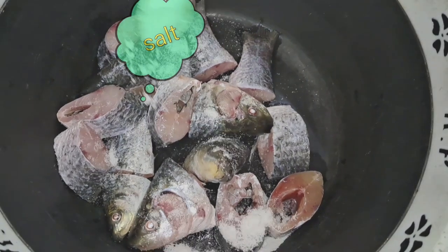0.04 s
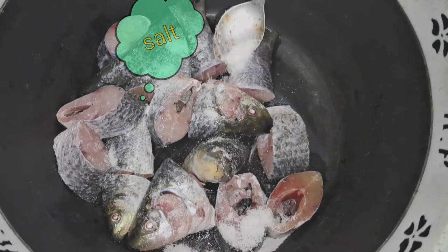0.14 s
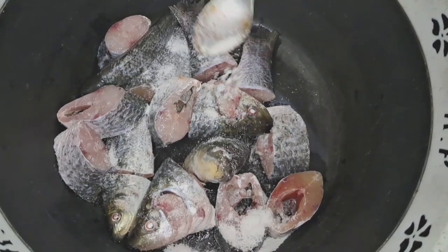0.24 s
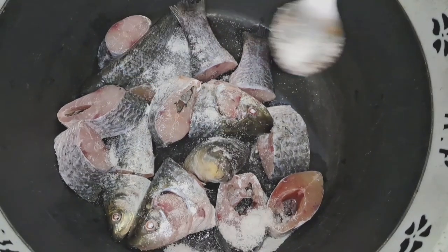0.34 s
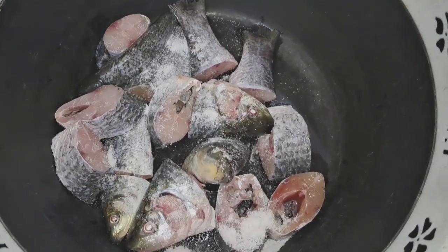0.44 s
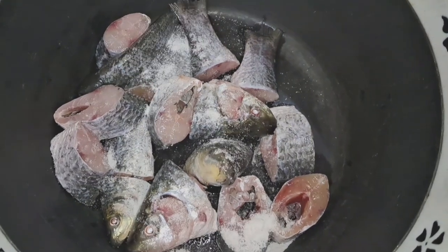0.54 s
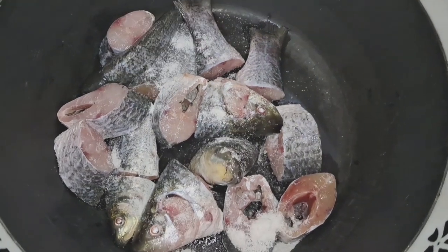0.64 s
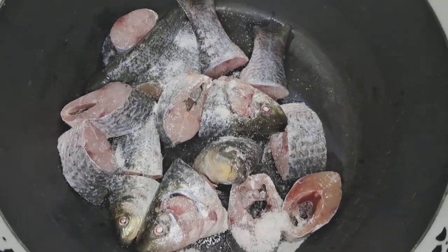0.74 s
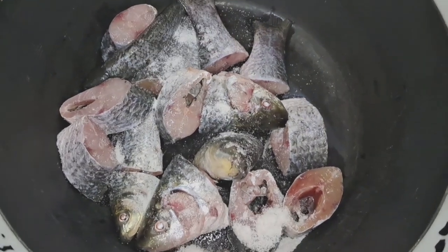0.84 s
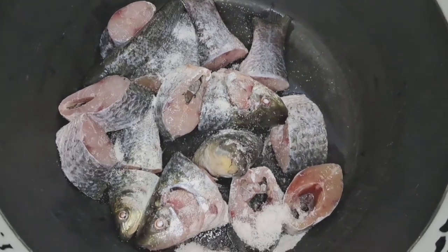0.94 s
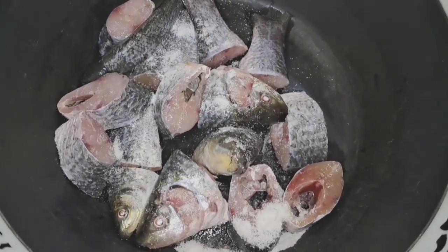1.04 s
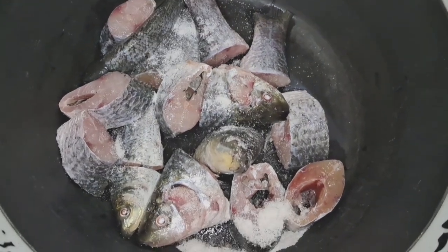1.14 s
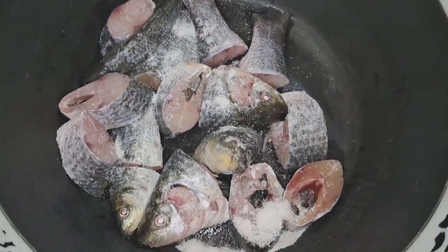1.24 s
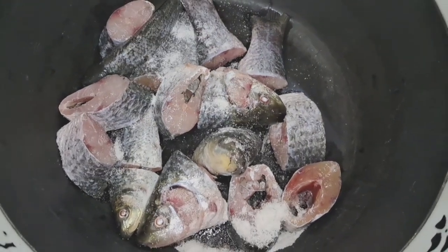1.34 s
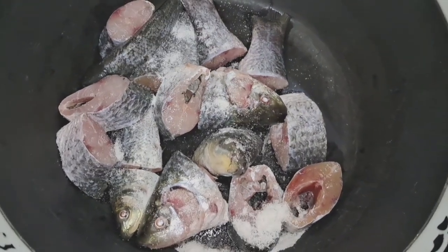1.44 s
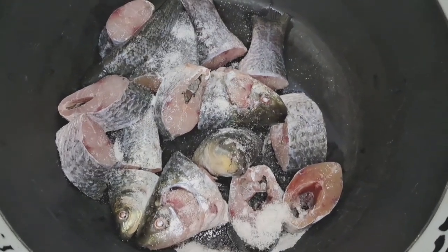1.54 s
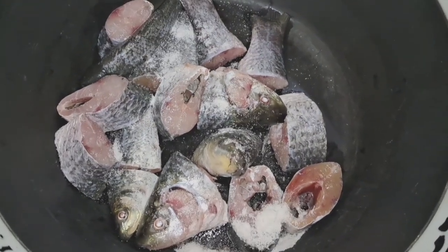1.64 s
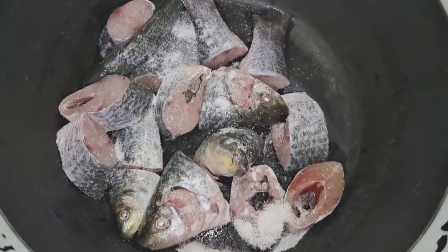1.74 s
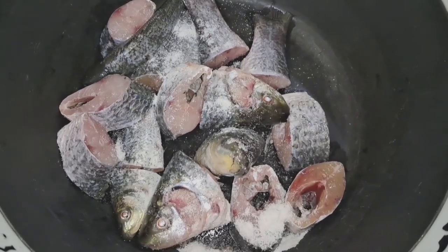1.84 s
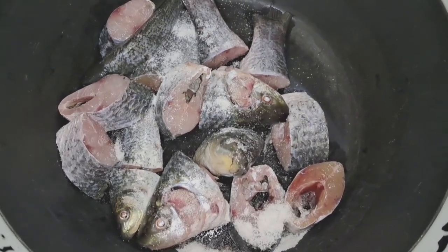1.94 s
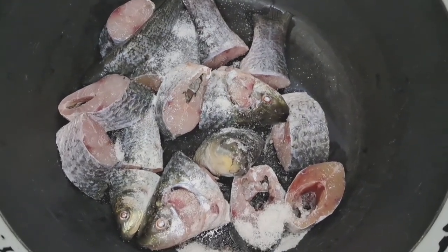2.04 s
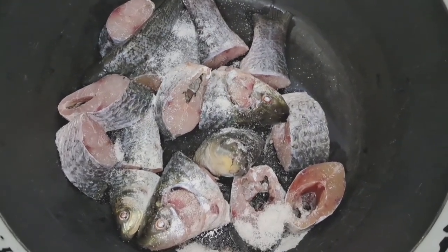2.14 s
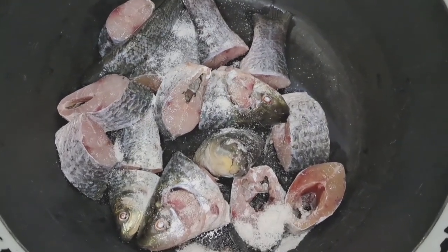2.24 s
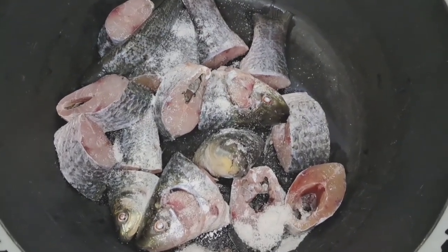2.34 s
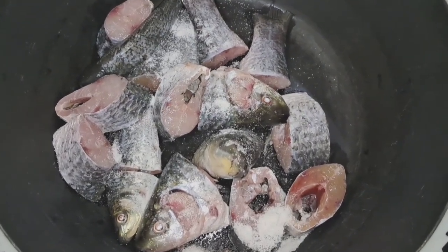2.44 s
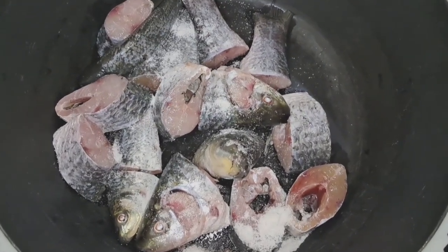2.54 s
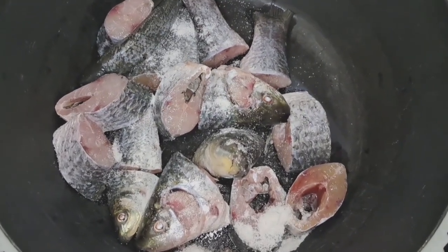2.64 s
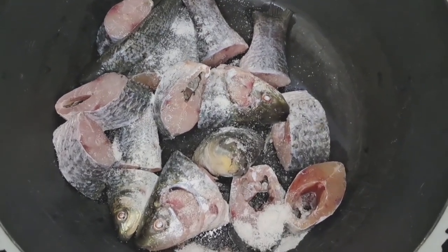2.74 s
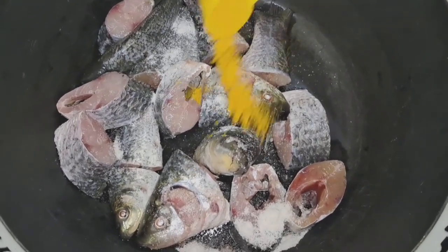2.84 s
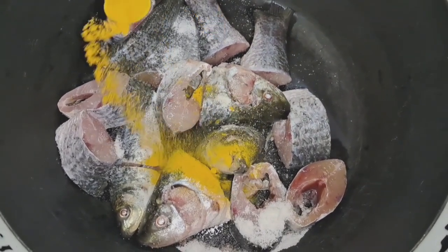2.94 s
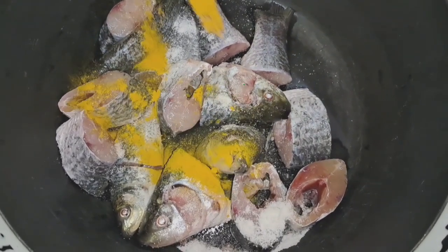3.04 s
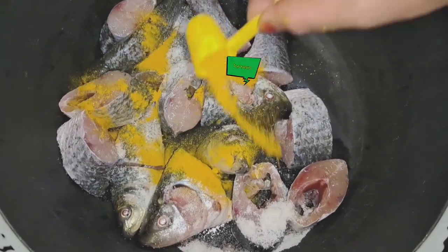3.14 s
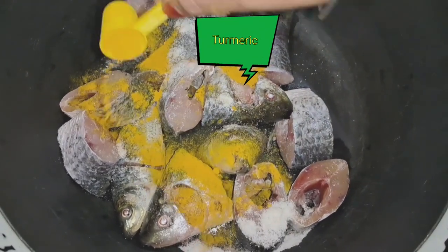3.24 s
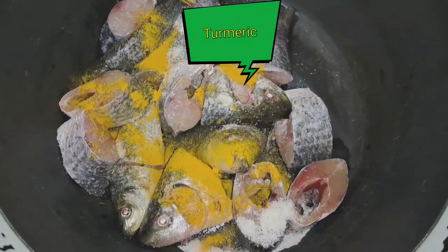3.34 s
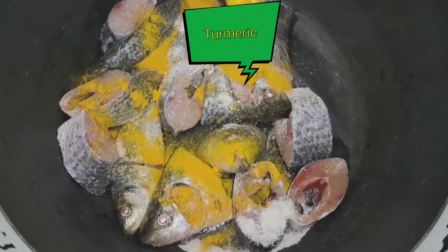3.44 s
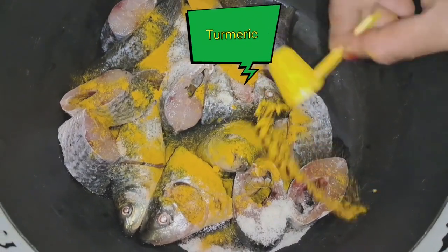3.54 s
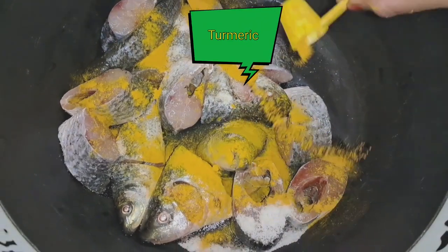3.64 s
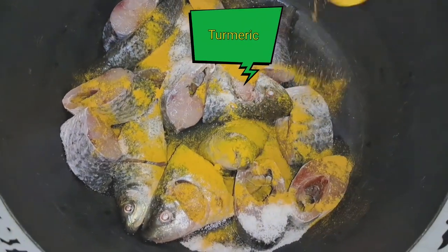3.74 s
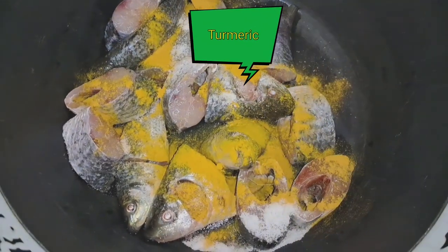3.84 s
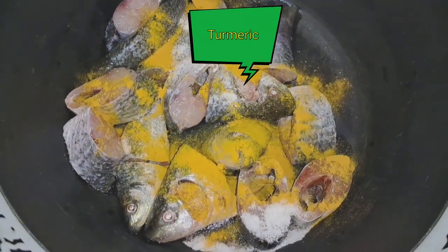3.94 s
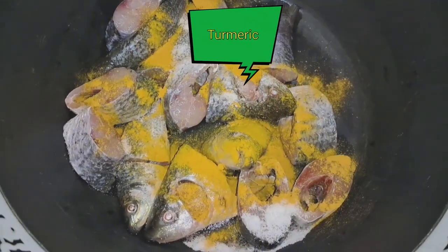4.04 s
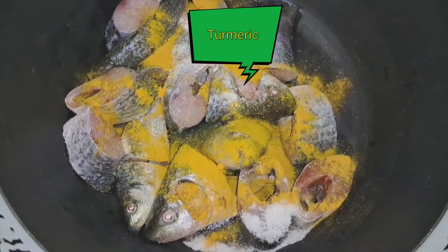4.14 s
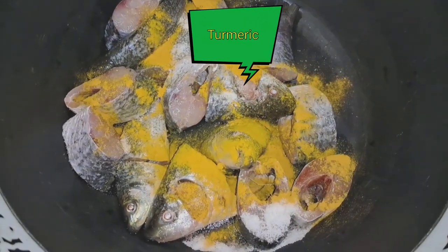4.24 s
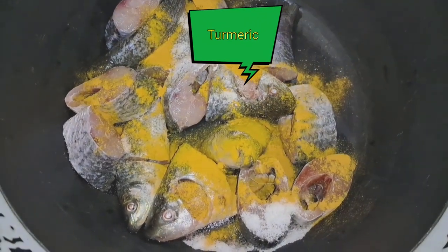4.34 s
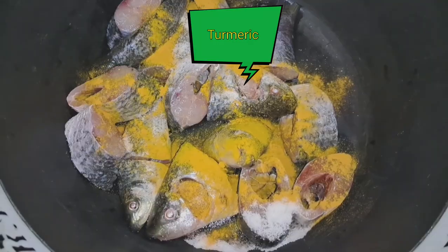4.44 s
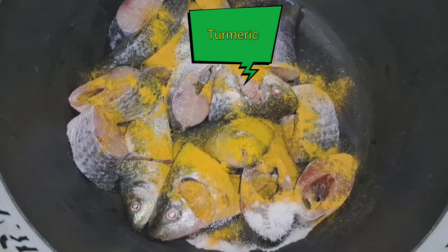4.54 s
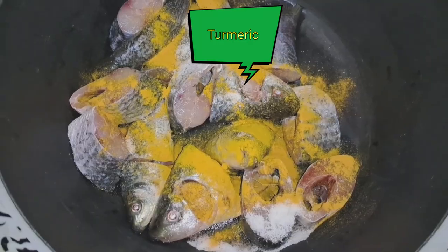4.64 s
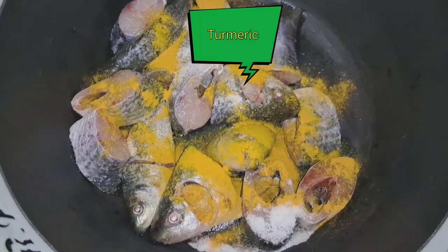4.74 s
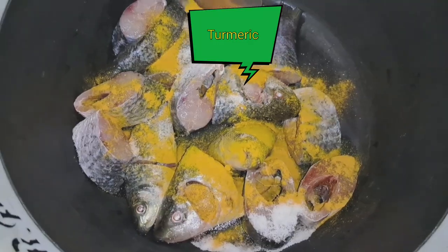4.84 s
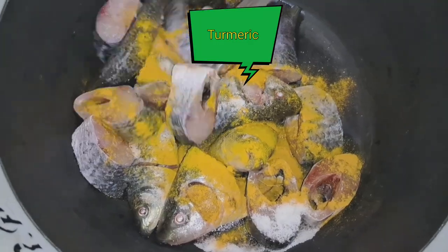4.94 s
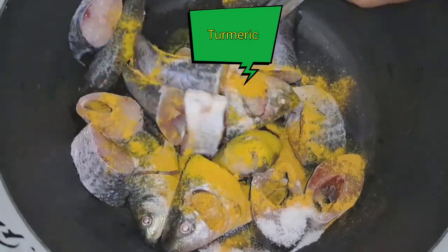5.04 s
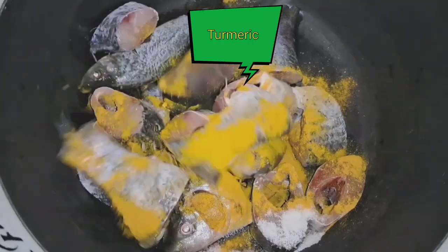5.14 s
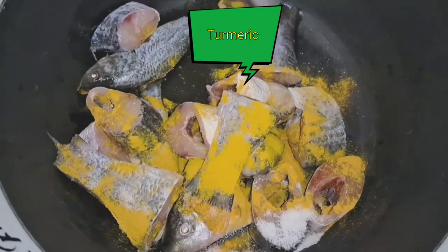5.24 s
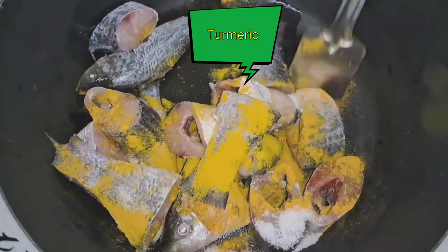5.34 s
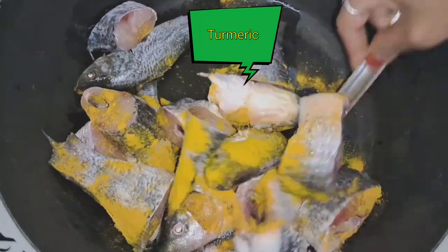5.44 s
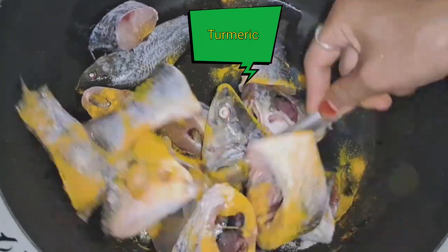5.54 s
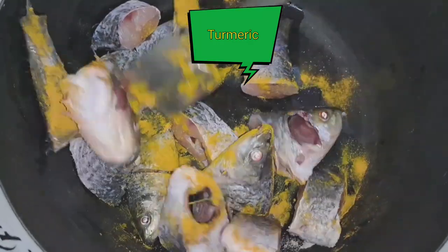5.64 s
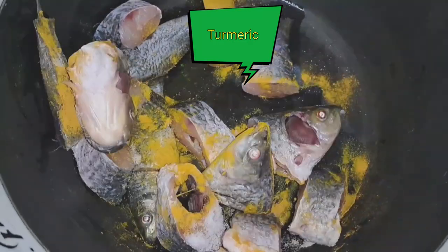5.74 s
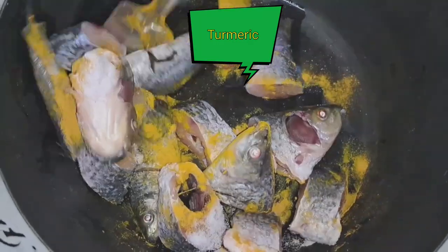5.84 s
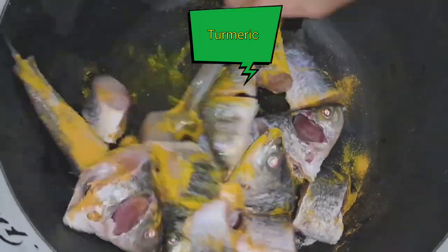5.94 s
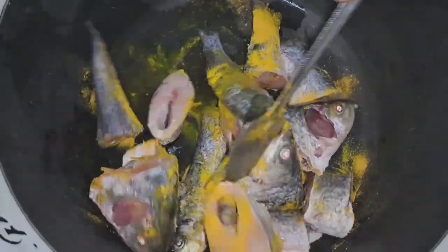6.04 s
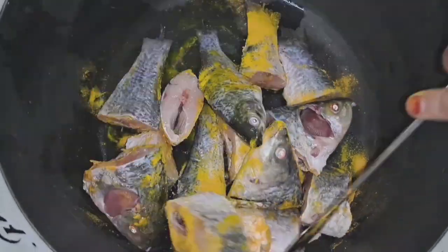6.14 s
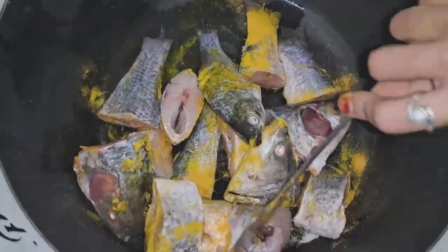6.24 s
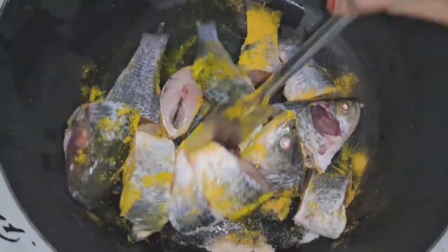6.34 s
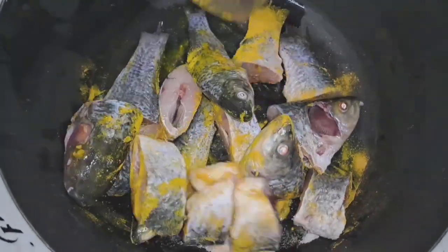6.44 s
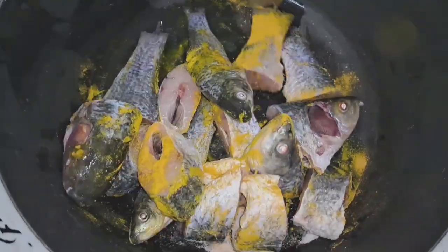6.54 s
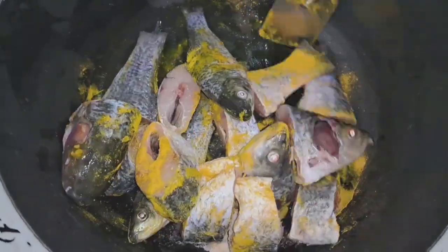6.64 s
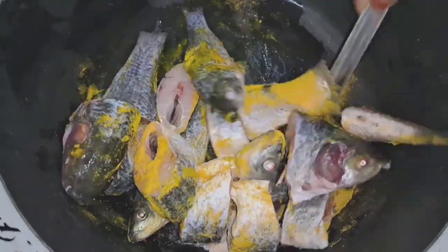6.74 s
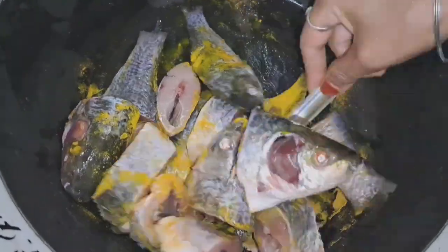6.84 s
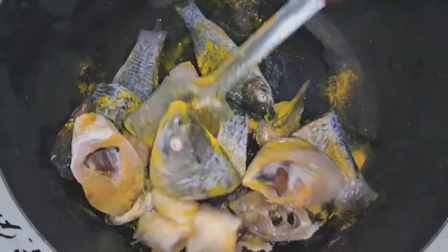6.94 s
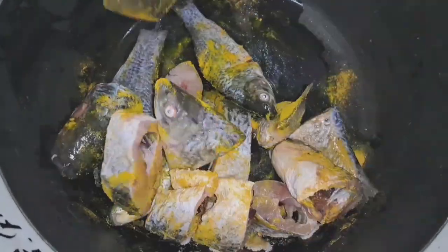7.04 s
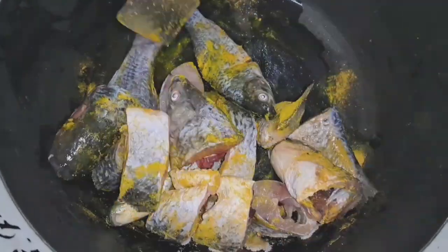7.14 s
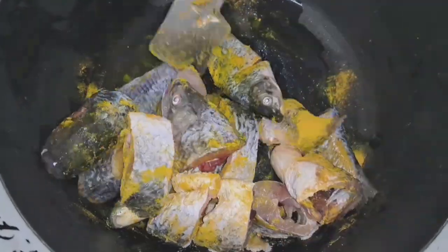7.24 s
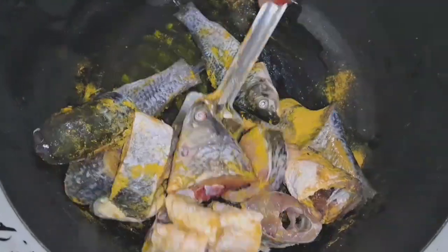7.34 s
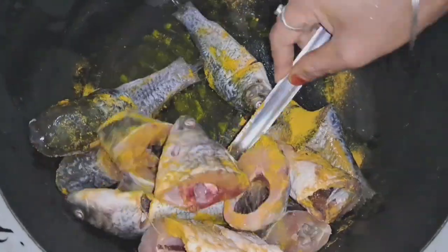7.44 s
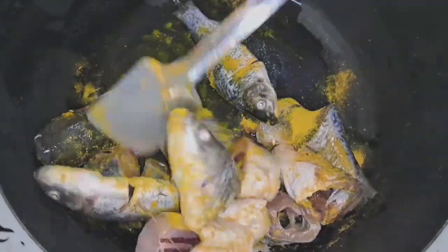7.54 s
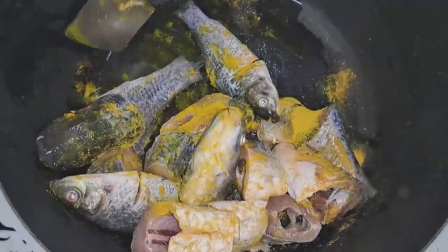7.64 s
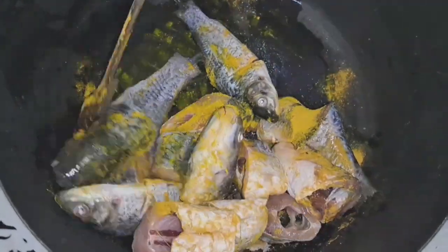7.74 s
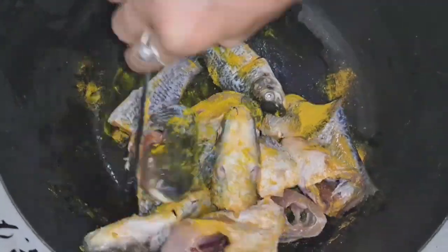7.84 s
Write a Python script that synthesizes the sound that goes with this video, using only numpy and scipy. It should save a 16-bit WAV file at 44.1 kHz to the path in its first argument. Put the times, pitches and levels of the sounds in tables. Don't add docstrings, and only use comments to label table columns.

```python
import sys
import numpy as np
from scipy import signal
from scipy.fft import rfft, irfft, next_fast_len
from scipy.io import wavfile
from scipy.ndimage import uniform_filter1d

SR = 44100
rng = np.random.default_rng(int(sys.argv[2]) if len(sys.argv) > 2 else 0)


def invert_db(level):
    return 10 ** (np.asarray(level, dtype=float) / 20)


def store_wav(level_fs):
    pcm = np.round(np.clip(np.atleast_2d(level_fs), -1, 1) * 32767)
    wavfile.write(sys.argv[1], SR, pcm.T.astype(np.int16))


N = 347985


def evened(x):
    return x / np.sqrt(np.mean(x ** 2) + 1e-20)


def read(points, hz):
    f, value = np.transpose(points)
    return np.interp(np.log(hz + 1), np.log(f + 1), value)


def add(mix, s, sound):
    part = mix[..., round(s * SR):][..., :sound.shape[-1]]
    part += sound[..., :part.shape[-1]]


def coloured(x, spectrum):
    hz = np.fft.rfftfreq(x.shape[-1], 1 / SR)
    return irfft(rfft(x) * invert_db(read(spectrum, hz)), x.shape[-1])


def through(x, modes):
    out = 0
    for k, (hz, width, db) in enumerate(modes):
        b, a = signal.iirpeak(hz, hz / width, SR)
        out = out + (-1) ** k * invert_db(db) * signal.lfilter(b, a, x) / np.sqrt(width)
    return out


def resonate(x, hz, width):
    turn = np.exp(2j * np.pi * np.cumsum(hz) / SR)
    r = np.exp(-np.pi * width / SR)
    return 2 * (turn * signal.lfilter([1 - r], [1, -r], x / turn)).real


def slow(count, rate_hz):
    steps = rng.standard_normal((count, 1000))
    at = np.arange(N) / SR * rate_hz
    return np.array([np.interp(at, np.arange(len(v)), v) for v in steps])


def push(hz, t60, t):
    turns = hz * t + 0.073 * (1 - np.exp(-hz * t))
    decay = invert_db(-60 * t / max(t60, .004))
    swing = -np.sin(2 * np.pi * turns) * decay * (1 - np.exp(-t * hz * 3.64)) ** 2
    return swing / abs(swing).max()


def pressure(s, fade_s, rise_s, roundness):
    t = np.arange(N) / SR - s
    progress = np.minimum(abs(t) / np.where(t < 0, rise_s, fade_s), 5)
    return invert_db(-21.5 * progress ** roundness)


# frequency in Hz, lead in radians.
PORT_LEAD = [(100, .01), (700, 0.48), (1400, 0.74), (2100, 1.3), (2800, 2.2), (3500, 4.07), (5000, 4.9)]


def ports(pair, same, tilt):
    size = next_fast_len(N)
    hz = np.fft.rfftfreq(size, 1 / SR)
    a, b = rfft(pair, size)
    likeness = np.clip(read(same, hz), 0, 1)
    late = a * np.exp(-1j * read(PORT_LEAD, hz))
    right = likeness * late + np.sqrt(1 - likeness ** 2) * b
    half = invert_db(read(tilt, hz) / 2)
    return irfft(np.array([a * half, right / half]), size)[:, :N]


# frequency in Hz, level in dB.
HISS_COLOUR = [(20, -27), (60, -35), (120, -17), (200, -19.5), (500, -14), (800, -6), (1150, -4.5),
               (1500, -7), (3000, -5), (6800, -8), (7700, -5.5), (8600, -15), (15000, -14.5)]
# frequency in Hz, width in Hz, boost in dB.
HOUSING = [(260, 51, 8.5), (338, 23, 9.5), (428, 20, 8), (590, 33, 6), (808, 20, 8.5), (946, 37, 5),
           (1053, 53, 2.5), (1166, 24, 8.5), (1287, 11, 8), (1400, 120, -1.5), (1770, 24, 4),
           (2230, 210, 4), (2403, 75, 6), (3480, 130, 2.5), (12800, 1800, 3)]
# frequency in Hz, level in dB.
WHINES = [(7149, -81), (7262, -84), (7381, -70), (7494, -64), (7612, -64.5), (7730, -65.5), (7827, -65),
          (7940, -68), (8060, -84)]
# top in seconds, level in dB, swell in seconds, fade in seconds.
PUFFS = [
    (2.168, -44, 0.18, 0.34),
    (4.308, -36, 0.025, 0.12),
]
# frequency in Hz, level in dB.
PUFF_COLOURS = [
    [(2500, -13), (5000, 1), (7000, 3), (9000, -6), (13500, -2), (15000, 0)],
    [(1500, -29), (3500, -19), (4800, 6.5), (5600, -7), (7000, -3), (9000, -15), (13500, -9), (15000, 2.5)],
]
# frequency in Hz, likeness from 0 to 1.
FAR_LIKENESS = [(60, .1), (160, 0.11), (270, 0.88), (740, 0.87), (1400, 0.6), (2200, 0.61), (5000, 0.024)]
# frequency in Hz, left minus right in dB.
FAR_TILT = [(60, -5), (110, 2), (200, -3.5), (380, -4), (700, -7), (1290, 0.5), (2380, -3), (4400, -8.5),
            (8120, -8), (15000, 1.5)]


def kitchen(swell_db=0.54, waver_db=5.0, whine_db=4, ripple_db=1.5):
    t, hz = np.arange(N) / SR, np.fft.rfftfreq(N, 1 / SR)
    housing = invert_db(sum(db / (1 + (2 * (hz - f) / width) ** 2) for f, width, db in HOUSING))
    room_modes = evened(uniform_filter1d(rng.standard_normal(len(hz)), size=160))
    housing *= invert_db(ripple_db * np.minimum(hz / 1000, 1) * room_modes)
    hiss = coloured(rng.standard_normal((2, N)), HISS_COLOUR)
    hiss = irfft(rfft(hiss) * housing, N)
    rumble = signal.lfilter(*signal.butter(2, 500, fs=SR), hiss)
    hiss += rumble * (invert_db(slow(count=1, rate_hz=5.0) + 1.5) - 1)
    out = invert_db(-45 + swell_db * slow(count=1, rate_hz=6)) * evened(hiss)
    for f, db in WHINES:
        drift = np.cumsum(5 * slow(count=2, rate_hz=15), axis=1) / SR
        level = invert_db(db + whine_db + waver_db * slow(count=2, rate_hz=22))
        out += level * np.sin(2 * np.pi * (f * t + drift))
    for (s, db, swell_s, fade_s), colour in zip(PUFFS, PUFF_COLOURS):
        air = evened(coloured(rng.standard_normal((2, N)), colour))
        out += invert_db(db) * pressure(s, fade_s, swell_s, roundness=0.98) * air
    return ports(out, FAR_LIKENESS, FAR_TILT)


# start in seconds, level in dB, frequency
# in Hz, left port in dB against the right, shudder in dB.
BUMPS = [
    (4.813, -54, 42, -3, -30),
    (6.566, -54, 50, 0, -30),
    (7.158, -54, 50, 4, -30),
    (6.17, -60, 95, -3, -10),
    (0.5285, -27, 610, -31, -36),
    (3.665, -63, 90, -4, -20),
    (4.656, -56, 90.5, -5, -18),
]


def bumps():
    out, t = np.zeros((2, N)), np.arange(SR // 2) / SR
    for s, db, hz, left_db, shudder_db in BUMPS:
        shudder = through(rng.standard_normal((2, len(t))), [(200, 250, 10), (330, 200, -14)])
        shudder = evened(shudder) * invert_db(shudder_db - 60 * t / 2.5)
        swing = -signal.lfilter(*signal.butter(1, hz / 8, "high", fs=SR), push(hz, 1.9 / hz, t))
        add(out, s, invert_db(db) * (invert_db(np.array([[left_db], [0]])) * swing + shudder))
    return out


# frequency in Hz, width in Hz, level in dB.
BOWL = [(320, 165, -2), (470, 150, -1.5), (569, 28, -3.5), (641, 26, -1), (677, 27, -5), (768, 57, 1),
        (970, 420, 5), (1027, 160, 2.5)]
# start in seconds, peak in dB, frequency in Hz, bowl ring in dB against the peak.
BLOWS = [(4.087, -40.5, 900, -2.5), (4.8124, -13.5, 660, -21), (4.9911, -28, 695, -24),
         (5.229, -27, 560, -15), (5.2288, -29.5, 1050, -30), (4.8124, -16, 1070, -32),
         (4.871, -24.5, 900, -25), (5.4101, -21.5, 880, -10), (5.5116, -30, 720, -30),
         (5.5723, -30.5, 470, -19), (5.8155, -35, 690, -22), (5.839, -32, 624, -22),
         (6.5647, -13.5, 603, -44), (6.7664, -27, 592, -18), (6.8354, -29, 706, -30),
         (7.1572, -17.5, 535, -26), (7.3368, -33, 700, -1), (7.3981, -30.5, 616, -26),
         (7.7336, -25, 515, -4), (7.7838, -28, 690, -17), (6.9495, -30.5, 620, -25), (6.887, -36, 600, -25),
         (7.001, -28.5, 593, -20), (5.282, -44, 720, -25), (5.289, -42, 760, -25), (7.347, -28, 700, -25)]
# start in seconds, peak in dB, frequency in Hz, squelch in dB.
FLOPS = [(4.929, -51, 250, -51), (5.0993, -46, 278, -68), (5.204, -40, 293, -49), (5.229, -39, 300, -51),
         (5.2934, -36, 280, -62), (5.326, -41, 417, -51), (5.41, -34, 300, -54), (5.547, -36, 330, -43),
         (5.653, -35.5, 230, -47.5), (5.723, -31.5, 298, -50), (5.762, -44, 290, -49),
         (5.944, -44, 340, -50), (5.972, -29.5, 274, -47), (5.988, -37, 268, -52),
         (6.0101, -31.5, 250, -47), (6.057, -48, 370, -50.5), (6.63, -42, 250, -63),
         (6.72, -28.5, 290, -46), (6.819, -55, 250, -49), (6.8894, -33, 188, -44), (6.954, -29, 188, -50),
         (6.838, -35, 330, -55), (6.983, -34, 254, -44), (7.0037, -27, 282, -49), (7.159, -30, 300, -40),
         (7.183, -30, 370, -54), (7.347, -37, 250, -46), (7.606, -34.5, 264, -44), (7.732, -42, 300, -40.5),
         (7.878, -34, 322, -45)]


def thuds():
    out, t = np.zeros(N), np.arange(9000) / SR
    blows = [[*row, 0.011] for row in BLOWS]
    flops = [[*row[:3], -21, 0.0078] for row in FLOPS]
    for s, db, hz, ring_db, t60 in blows + flops:
        hum = through(rng.standard_normal(len(t)) * invert_db(-60 * t / 0.015), BOWL)
        thud = push(hz, t60 * np.sqrt(600 / hz), t)
        add(out, s, invert_db(db) * (thud + invert_db(ring_db) * hum / abs(hum).max()))
    return out


# start in seconds, level in dB, frequency in Hz, t60 in seconds, seconds until damped.
RINGS = [(4.815, -31, 631, .4, .055), (4.815, -34, 420, .15, .05), (4.84, -37, 1000, .2, .04),
         (4.815, -32, 575, .12, .04), (4.83, -38, 800, .3, .04), (6.567, -30, 635, .5, .056),
         (6.567, -34, 680, .3, .06), (4.818, -35, 2180, .15, .05), (6.567, -36, 425, .18, .07),
         (6.575, -43, 1841, .3, .05), (6.72, -38, 6100, .1, .03), (7.159, -39, 600, .2, .035),
         (7.337, -19, 1500, .035, .012), (6.72, -38, 1500, .1, .03), (4.861, -29, 1450, .04, .012),
         (5.233, -45, 720, .2, .03), (7.19, -37, 2980, .2, .035), (4.92, -39, 2400, .2, .02),
         (7.186, -35, 610, .06, .015), (5.06, -39, 1450, .1, .02), (5.601, -40, 1500, .08, .015)]


def rings():
    out, t = np.zeros(N), np.arange(SR // 2) / SR
    for s, db, hz, t60, free_s in RINGS:
        loss_db = 60 * (t / max(t60, .01) + np.maximum(t - free_s, 0) / 0.04)
        add(out, s, invert_db(db - loss_db) * np.sin(2 * np.pi * hz * t) * (1 - np.exp(-t / 0.0026)))
    return out


# frequency in Hz, width in Hz, level in dB.
BLADE = [(1460, 160, 3), (1805, 140, 6), (1863, 120, 5.5), (2180, 106, 3.5), (2500, 170, 3.5),
         (2950, 240, 8.5), (3570, 360, -0.5), (3800, 55, 3.5), (4760, 760, -13.5)]
# start in seconds, peak in dB, clack in Hz, tick in dB against the clack, t60 in seconds.
KNOCKS = [(4.812, -5, 2320, -19.5, 0.0046), (4.861, -16.5, 1440, -14, 0.011),
          (5.4089, -10, 2500, -20, 0.003), (5.4985, -22, 1520, -21, .016), (5.508, -22.5, 2630, -19, .012),
          (5.8375, -11, 2390, -19, 0.0082), (5.902, -16.5, 2850, -16, 0.0087),
          (6.5647, -5.5, 2060, -20, 0.0056), (6.5653, -23, 1880, -22, .012),
          (5.8399, -17.5, 1580, -21, 0.011), (6.72, -24.5, 1460, -17, .021),
          (6.7196, -20.5, 2640, -7, .015), (6.766, -19.5, 1870, -7, 0.0092),
          (6.769, -17.5, 1540, -18, 0.0099), (6.8336, -13.5, 1900, -20, 0.0057),
          (7.001, -16, 2000, -20, 0.0048), (7.1563, -1.5, 2510, -23, 0.0027),
          (7.3359, -13.5, 1450, -27, 0.011), (7.3984, -25, 2350, -3, 0.007),
          (7.7337, -19, 1680, -19, 0.012)]
# start in seconds, peak
# in dB, frequency in Hz, tick in dB against the ping.
PINGS = [(4.813, -26, 2770, -15), (4.8418, -23, 2650, -9), (4.863, -25.5, 2950, -8), (5.41, -23, 5900, -10),
         (5.4347, -30, 4180, -16), (5.547, -27, 3880, -10), (5.8399, -18, 2950, -13),
         (7.7347, -19, 2140, -25), (6.564, -24, 2670, -14), (6.769, -22.5, 2950, -10),
         (7.156, -34, 2730, -31), (7.335, -17, 2120, -17), (7.821, -28, 3240, -10),
         (4.8125, -23, 1900, -16), (4.813, -24.5, 3800, -10), (4.818, -31, 5900, -14),
         (4.8415, -29, 5900, -8), (4.851, -30, 3000, -12), (4.861, -29, 6200, -8), (4.862, -32, 8000, -8),
         (4.991, -35, 6000, -8), (5.044, -34, 7000, -6), (5.05, -32, 6100, -8), (5.054, -30, 2080, -12),
         (5.4095, -27, 4600, -8), (5.4315, -27, 8000, 2), (5.4315, -27, 4200, -8), (5.451, -33, 5200, -14),
         (5.477, -32, 5000, -12), (5.507, -30, 6700, -13), (5.548, -33, 6700, -14), (5.814, -33, 4700, 3),
         (5.838, -27, 6100, -10), (5.885, -35, 8500, -8), (5.902, -31, 6100, -10), (5.917, -34, 6900, -12),
         (5.974, -33, 6000, -10), (6.613, -35, 4000, -6), (6.627, -32, 2750, -16), (6.697, -38, 2600, -16),
         (6.737, -31, 2850, -16), (6.818, -31, 2800, -14), (6.843, -30, 1900, -14), (6.858, -31, 2150, -14),
         (6.978, -34, 2700, -14), (6.998, -32.5, 1440, -16), (7.1572, -22, 1820, -14),
         (7.218, -29, 3000, -16), (7.2906, -31, 2590, -14), (7.297, -29, 2500, -16),
         (7.326, -29, 3000, -14), (7.3352, -19, 3000, -11.5), (7.357, -29, 2800, -17),
         (7.366, -33, 5000, -14), (7.367, -27, 2650, -14), (7.3976, -30, 4600, -10), (7.398, -28, 7700, -3),
         (7.398, -33, 11600, -8), (7.458, -36, 1700, -16), (7.775, -34, 11500, 0), (7.878, -33, 10500, -6),
         (7.879, -33, 6200, -10), (7.882, -26, 2650, -16)]
# start in seconds, peak in dB, frequency in Hz, tick in dB, t60 in seconds.
LONG_PING = (6.719, -31, 5900, -16, .08)
# start in seconds, peak in dB, clack in Hz.
TAPS = [(4.9893, -34, 1400), (5.043, -36, 1360), (5.06, -26.5, 1400), (5.2288, -31, 1730),
        (5.326, -30.5, 1430), (5.459, -28, 1420), (5.5475, -42, 1460), (5.605, -28, 1750),
        (5.6467, -32, 1790), (5.816, -32, 1670), (6.6285, -28, 1710), (6.704, -26, 2500),
        (6.857, -25.5, 1630), (6.9496, -34, 2090), (6.9765, -30, 2150), (7.191, -27, 3000),
        (7.227, -29, 1380), (7.327, -24, 1980), (7.445, -29, 1900), (7.447, -26, 1680), (7.5991, -38, 1370),
        (7.627, -30, 1460), (7.7774, -29, 2200), (7.879, -29, 2650)]


def knocks(ring_db=-11, burst_s=0.0085, tick_db_up=8, rise_s=0.0005, crack=-2.1):
    out, t = np.zeros((2, N)), np.arange(3000) / SR
    bright = signal.butter(1, [1100, 8000], "band", fs=SR)
    pings = [[*row, 0.02] for row in PINGS]
    taps = [[*row, -16, 0.017] for row in TAPS]
    for s, db, hz, tick_db, t60 in [*KNOCKS, *pings, *taps, LONG_PING]:
        burst = rng.standard_normal((2, len(t))) * invert_db(-60 * t / burst_s)
        swing = -np.sin(2 * np.pi * hz * t * [[1], [1.04]])
        clack = swing * invert_db(-60 * t / max(t60, .003)) * (1 - np.exp(-t / rise_s))
        ring = through(burst, BLADE) * invert_db(-60 * t / max(2 * t60, .003))
        burst[:, 0] += crack
        tick = signal.lfilter(*bright, burst)
        ring = invert_db(ring_db) * ring / abs(ring).max()
        tick = invert_db(tick_db + tick_db_up) * tick / abs(tick).max()
        add(out, s + .0005, invert_db(db) * (clack + ring + tick))
    return out


# start in seconds, fade in seconds,
# blade ring in dB, bowl rumble in dB against the ring, grit in dB against the ring.
SKIDS = [(4.815, 0.11, -38.5, 8.5, -6), (4.994, 0.073, -34.5, -14, -7), (5.047, .06, -41.5, 4.5, 1),
         (5.227, 0.085, -49, 1, -17), (5.412, 0.064, -32.5, -3, -10), (5.819, 0.097, -44.5, 1, -6),
         (5.839, 0.13, -31.5, -9, -7), (6.568, 0.28, -42, 2.5, -2.5), (6.72, 0.17, -40, -5, -1.5),
         (6.768, 0.16, -33.5, -8, -3), (7.161, 0.14, -40.5, 3.5, -4), (7.739, 0.2, -36.5, -5, -3)]
# full pressure in seconds, fade in seconds,
# blade ring in dB, bowl rumble in dB against the ring, grit in dB against the ring.
DRAGS = [(4.85, 0.072, -40, -7, -2), (4.92, 0.19, -43, 1, 1), (5.066, 0.12, -39, -5.5, 0),
         (5.33, .12, -55, -5, -16), (5.44, 0.085, -41, -2.5, 3), (5.485, 0.14, -38, -7, -5),
         (5.57, 0.16, -42.5, -2, 0), (5.92, 0.21, -38, -21, -1.5), (6.12, 0.069, -48.5, -6, -6),
         (6.85, 0.15, -46, -2.5, -0.5), (6.99, 0.12, -45.5, -2, -6.5), (7.23, 0.076, -43.5, -15, -9),
         (7.305, 0.085, -37.5, -13, -14), (7.349, 0.097, -34.5, -20, -8), (7.4, 0.06, -43.5, -0.5, 1),
         (7.445, 0.14, -46.5, -7.5, -1.5), (7.63, 0.11, -49, -4, -11), (7.8, 0.13, -47, 4.5, -12),
         (7.885, 0.14, -37.5, -12, -5.5)]


def contact():
    power = np.zeros((4, N))
    land_s, skid_round = 0.0049, 0.98
    skids = [(row, land_s, skid_round) for row in SKIDS]
    drags = [(row, 0.51 * row[1], 1.48) for row in DRAGS]
    for (s, fade_s, ring_db, bowl_db, grit_db), rise_s, roundness in skids + drags:
        shares = invert_db(ring_db + np.array([[bowl_db], [1.5], [grit_db + 3.0], [-49]]))
        power += (shares * pressure(s, fade_s, rise_s, roundness)) ** 2
    for s, _, _, squelch_db in FLOPS:
        squelch = pressure(s + land_s, 0.085, land_s, skid_round)
        power[3] += (invert_db(squelch_db) * squelch) ** 2
    return np.sqrt(power)


# frequency in Hz, level in dB.
GRIT = [(1500, -24), (3000, 7), (4000, 2.5), (5200, 0.5), (7200, 0), (8500, -4.5), (12000, -3.5),
        (15000, -6)]
# frequency in Hz, width in Hz, level in dB.
SHEEN = [(3050, 60, -4), (3440, 100, -7), (4580, 68, 1), (5040, 170, 4), (5400, 29, -1), (6000, 110, 3.5),
         (6500, 61, -2), (7220, 140, 3.5), (8400, 110, -0.5), (9200, 79, -4)]
# time in seconds, favoured frequency in Hz.
SPOT = [(4.82, 2300), (4.87, 1500), (4.93, 2500), (5.0, 1700), (5.07, 1890), (5.43, 2100), (5.5, 1700),
        (5.57, 1600), (5.63, 1700), (5.85, 2600), (5.92, 2870), (6.04, 1930), (6.6, 1900), (6.8, 2000),
        (7.2, 2790), (7.3, 2670), (7.37, 2700), (7.45, 1740)]


def scrape(flutter_db=1.3, focus_db=5, grains_per_s=5200, grain_spread_db=3.0, sheen_db=-8, waver_db=5):
    sizes = invert_db(grain_spread_db * np.minimum(rng.exponential(1, (2, N)), 5))
    clicks = sizes * (rng.random((2, N)) < grains_per_s / SR)
    rub = evened(clicks * rng.choice([-1., 1.], (2, N)))
    rub = rub * invert_db(flutter_db * slow(count=1, rate_hz=110))
    waver = invert_db(waver_db * slow(count=len(SHEEN), rate_hz=23))
    sheen = sum(gain * through(rub, [mode]) for gain, mode in zip(waver, SHEEN))
    grit = evened(coloured(rub, GRIT)) + invert_db(sheen_db) * evened(sheen)
    blade = through(rub, BLADE)
    spot_hz = np.interp(np.arange(N) / SR, *np.transpose(SPOT))
    blade += invert_db(focus_db) * resonate(blade, spot_hz, 2100)
    wet = through(through(rub, [(230, 340, 0)]), [(230, 360, 0)])
    layers = through(rub, BOWL), blade, grit, wet
    return sum(gain * evened(layer) for gain, layer in zip(contact(), layers))


# frequency in Hz, t60 in seconds.
ROOM_DECAY = [(200, 0.35), (1000, 0.68), (4000, 0.3), (12000, 0.12)]


def room(x):
    taps = np.zeros((2, SR // 2))
    at = np.arange(200, SR // 2 - 20, 20) + rng.integers(0, 20, (2, (SR // 2 - 201) // 20))
    np.put_along_axis(taps, at, rng.choice([-1., 1.], at.shape), 1)
    hz, t, z = signal.stft(taps, SR, nperseg=256)
    decay = invert_db(-60 * t / read(ROOM_DECAY, hz)[:, None])
    tail = signal.istft(z * decay, SR, nperseg=256)[1]
    return signal.fftconvolve(x, tail / np.linalg.norm(tail[0]), axes=1)[:, :N]


# frequency in Hz, likeness from 0 to 1.
NEAR_LIKENESS = [(60, 0.91), (270, 1), (740, 1), (1400, 0.97), (2100, 0.39), (2800, 0.37), (4000, 0.11),
                 (8000, 0.14)]
# frequency in Hz, left minus right in dB.
NEAR_TILT = [(60, -10), (130, 2), (290, 0), (640, -2), (1410, 0), (3100, -1.5), (6820, -7), (15000, 3.5)]


def scene():
    hits = knocks() + thuds() + rings()
    wok = scrape() + hits + invert_db(-15) * room(hits)
    wok = signal.lfilter(*signal.butter(2, 150, "high", fs=SR), wok)
    return ports(wok, NEAR_LIKENESS, NEAR_TILT) + kitchen() + bumps()


def top_cut(x):
    return signal.sosfilt(signal.butter(12, 15350, fs=SR, output="sos"), x)


def record(dry):
    return top_cut(dry)


dry = scene()
out = record(dry)
store_wav(out)
```